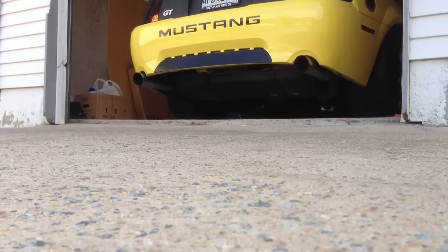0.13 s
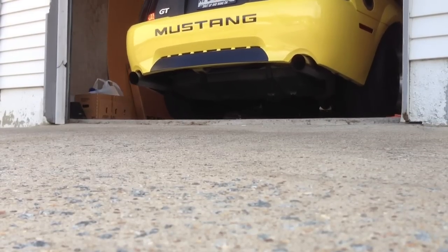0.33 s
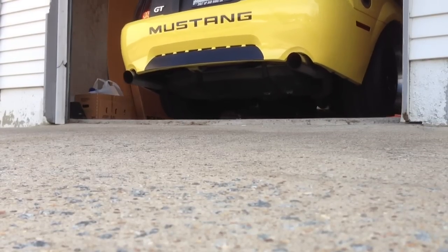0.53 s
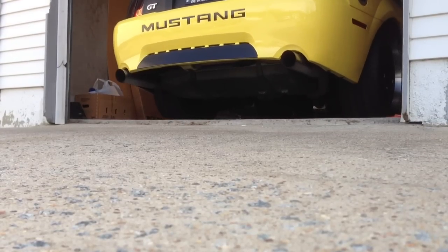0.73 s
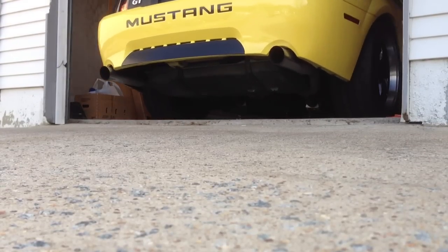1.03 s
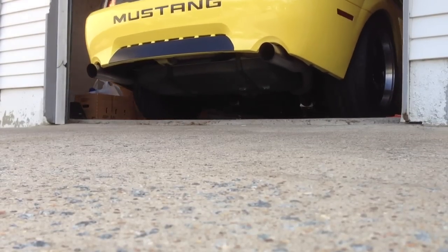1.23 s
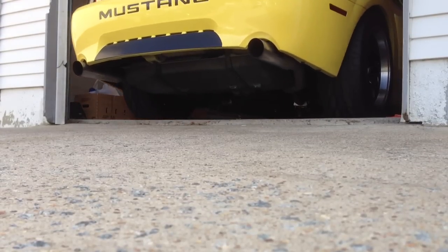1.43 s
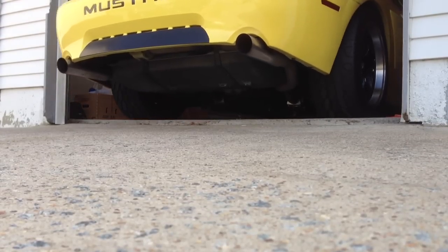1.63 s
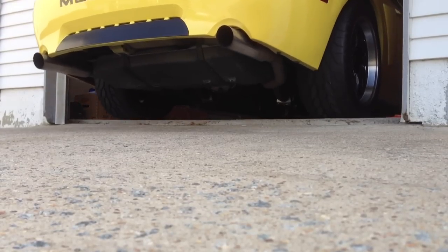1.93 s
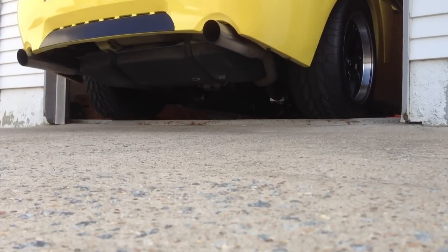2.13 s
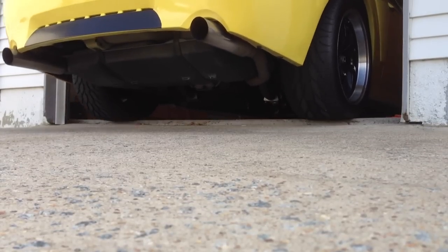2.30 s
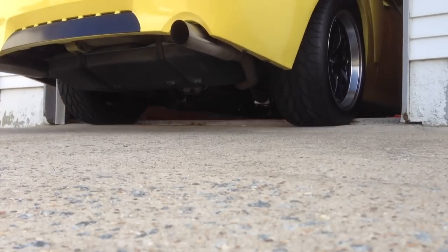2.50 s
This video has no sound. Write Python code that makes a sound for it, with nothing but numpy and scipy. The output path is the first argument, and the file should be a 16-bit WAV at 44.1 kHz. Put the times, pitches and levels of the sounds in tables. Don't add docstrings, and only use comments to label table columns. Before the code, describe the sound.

V8 car exhaust idles with a lumpy burble in a garage, then backs out growling louder

```python
import sys
import numpy as np
from scipy import signal
from scipy.io import wavfile
from scipy.ndimage import uniform_filter1d

SR = 44100
rng = np.random.default_rng(int(sys.argv[2]) if len(sys.argv) > 2 else 0)


def to_wav(sig):
    pcm = np.clip(np.atleast_2d(sig), -1, 1) * 32767
    pcm = np.round(pcm).astype(np.int16)
    wavfile.write(sys.argv[1], SR, pcm.T)


def voltage_ratio(decibels):
    exponent = np.asarray(decibels, float) / 20
    return 10 ** exponent


N = 117306

# t/s, four-stroke cycle rate/Hz
ENGINE_SPEED = [(0, 7.4), (.2, 7.05), (.4, 6.84), (.62, 6.77), (.8, 6.83), (.95, 7.1), (1.1, 7.62),
                (1.22, 7.8), (1.32, 8.15), (1.4, 8.5), (1.5, 8.92), (1.65, 9.33), (1.77, 9.47), (1.9, 9.51),
                (2.1, 9.42), (2.38, 9.27), (2.66, 9.38)]
# t/s, exhaust level/dB, engine-bay level/dB, share out of the garage/0-1
APPROACH = [(0, -30, -45.5, 0.37), (.2, -28.5, -46.5, 0), (.45, -29.5, -46.5, 0.28), (.7, -27, -46, 0.43),
            (.9, -29, -44.5, 0.11), (1.05, -25.5, -43.5, 0.35), (1.2, -21, -42, 0.65),
            (1.35, -22, -41.5, 0.49), (1.5, -16.5, -40, 0.9), (1.7, -15.5, -39.5, 0.75),
            (1.95, -17, -39.5, 0.75), (2.2, -16.5, -40, 0.85), (2.45, -17, -40.5, 0.83),
            (2.66, -15, -40, 0.87)]
FIRING_PIPE = [0, 1, 0, 1, 1, 0, 1, 0]
# level/dB, delay/ms, brightness/per octave
CYLINDERS = [(1.5, 0.083, -0.53), (-.5, 0.088, .5), (1.5, 0.13, 0.056), (0, 1.51, 0.65),
             (-6, 0.074, -0.064), (-2.5, 0.17, -.1), (-3, 0.13, 0.074), (-6.5, 0.081, 0.21)]
# f/Hz, width/Hz, near-pipe level/dB, far-pipe level/dB, change inside the garage/dB
PIPE_MODES = [(104.8, 5.5, -10, -19, -12), (123.7, 23.8, -11.5, -12, 17), (170, 19, -20.5, -24, 7),
              (196.1, 13.7, 1, -7.5, -0.5), (223.6, 7.1, -4.5, -9, -7), (261, 20.8, 0, -5.5, 1),
              (309.3, 11.5, -13.5, -2.5, 1), (344, 27.3, -6.5, -3, -4), (369, 14, -10, -8.5, -6.5),
              (453.5, 18, -11, -10.5, 3.5), (576, 14, -20.5, -21.5, 6.5), (660.7, 62, -19, -21.5, -6.5),
              (266, 110, -12, -20, -21), (483, 56, -22.5, -17, -10)]
# f/Hz, density/dB per Hz
RUMBLE_SPECTRUM = [(12, -67), (20, -37), (48, -54), (107, -12.5), (260, -3.5), (401, -9), (455, -8.5),
                   (857, -22), (1500, -34.5), (1950, -41), (3300, -120)]
DRONE_ORDERS = [39, 24, 18, 21, 40]
# f/Hz, width/Hz, level against the exhaust/dB
STANDING_WAVES = [(263.7, 19, -2), (191, 14, 2.5), (126.4, 14, -8.5), (197, 11.7, -8.5), (331, 20, -2)]
# f/Hz, density/dB per Hz
BAY_SPECTRUM = [(410, -17), (700, -5), (990, -10.5), (1150, -9), (2030, -16), (2400, -14.5), (4170, -16.5),
                (7060, -23.5), (15100, -42.5)]
# t/s, peak level/dB, f/Hz
GRIT_CRACKS = [(.7907, -37.5, 7500), (.9924, -43, 8000), (1.148, -31.5, 7000), (1.1785, -40, 10000),
               (1.2062, -44, 11000), (1.2544, -45, 9000), (1.3353, -23, 6300), (1.3424, -19, 7380),
               (1.4659, -28, 8200), (1.5364, -37, 9000), (1.5664, -34.5, 10500), (1.61, -36.5, 10000),
               (1.6272, -35, 10400), (1.634, -40, 10000), (1.9826, -41, 10000), (2.1264, -55.5, 9200),
               (2.6107, -32, 11500)]
# f/Hz, density/dB per Hz
STREET_SPECTRUM = [(12, -32), (25, -8), (50, -4), (90, 2), (130, -18), (200, -60)]

FIRST_CYL_S = 2.073
IDLE_HZ, PULL_HZ, UNEVEN_IDLE = 6.8, 9.3, .45
SCATTER_DB, SCATTER_MS = .8, .1
STUMBLE_DB, STUMBLE_MS = .35, .3
FAR_PIPE_MS, SKIRT_HZ, SWEEP_MS_PER_KHZ = 2.55, 52.6, 18.15
TONE_HZ = 270
GARAGE_T60_S, GARAGE_DB = 0.28, 5.5
DEAD_HZ, DEAD_WIDTH_HZ, DEAD_SHARE = 149, 22, .7
RUMBLE_DB, BOOM_DB = -12, 4
DRONE_LUMP, DRONE_LUMP_TURN = .3, .85
PUFF, PUFF_SHARE, LOPE_SHARE, PATCH_DB = 0.42, 0.14, 0.026, 1.5
CRACK_S, CRACK_TAIL_S, CRACK_TAIL_DB = 0.00059, 0.0078, -19.5
CRACK_WIDTH, SNAP_DB = .58, -1
FINE_GRIT_PER_S, FINE_GRIT_DB = 30, -48
STREET_DB = -59
EDGE_HZ = 15350


def evened(x):
    return x / np.sqrt(np.mean(x ** 2) + 1e-20)


def along(table, column):
    rows = np.array(table)
    return np.interp(np.arange(N) / SR, rows[:, 0], rows[:, column])


def resonate(x, hz, width):
    pole = np.exp((2j * np.pi * hz - np.pi * width) / SR)
    return 2 * signal.lfilter([1 - abs(pole)], [1, -pole], x).real


def noise(spectrum, patch_db):
    hz = np.fft.rfftfreq(1024, 1 / SR)
    real, imag, patch = rng.standard_normal((N // 256 + 5, 513, 3)).T
    patch = uniform_filter1d(patch, size=14, axis=0)
    patch = evened(uniform_filter1d(patch, size=8, axis=1))
    f, db = np.transpose(spectrum)
    shape = np.interp(np.log(hz + 1), np.log(f + 1), db)[:, None]
    bins = (real + 1j * imag) * voltage_ratio(shape + patch_db * patch)
    return evened(signal.istft(bins, nperseg=1024, noverlap=768)[1][:N])


def firing_count():
    firings = 8 * np.cumsum(along(ENGINE_SPEED, column=1)) / SR
    return firings - firings[round(FIRST_CYL_S * SR)] + 800


def exhaust():
    inside = 1 - np.clip(along(APPROACH, column=3), 0, 1)
    kicks = firing_kicks()
    warm = round(2 * SR / ENGINE_SPEED[0][1])
    kicks = np.c_[kicks[:, :warm], kicks]
    inside_warm = np.r_[inside[:warm], inside]
    kicks = kicks + voltage_ratio(GARAGE_DB) * inside_warm * garage_echoes(kicks)
    out = ringing_pipes(kicks, inside_warm)[warm:]
    out = out - DEAD_SHARE * resonate(out, DEAD_HZ, DEAD_WIDTH_HZ)
    power = uniform_filter1d(uniform_filter1d(out ** 2, size=9000), size=9000)
    out = out / np.sqrt(power)
    rumble = voltage_ratio(RUMBLE_DB + BOOM_DB * inside) * noise(RUMBLE_SPECTRUM, patch_db=2.6)
    return voltage_ratio(along(APPROACH, column=1)) * (out + drones() + rumble)


def firing_kicks():
    count, speed = firing_count(), along(ENGINE_SPEED, column=1)
    k = np.arange(np.ceil(count[0]), count[-1]).astype(int)
    db, late_ms, tone = np.array(CYLINDERS)[k % len(CYLINDERS)].T
    pipe = np.array(FIRING_PIPE)[k % len(CYLINDERS)]
    luck = rng.standard_normal((400, 2))[:len(k)]
    at = np.interp(k, count, np.arange(N))
    now = at.astype(int)
    climb = np.maximum(np.gradient(speed) * SR, 0)[now]
    pull = np.interp(speed[now], [IDLE_HZ, PULL_HZ], [UNEVEN_IDLE, 1])
    scatter_ms = (SCATTER_MS + STUMBLE_MS * climb) * luck[:, 0]
    scatter_db = (SCATTER_DB + STUMBLE_DB * climb) * luck[:, 1]
    at = at + (late_ms + FAR_PIPE_MS * pipe + scatter_ms) * SR / 1000
    at = np.clip(at.astype(int), 0, N - 1)
    kicks = np.zeros((4, N))
    kicks[pipe, at] = voltage_ratio(2 * db * pull + scatter_db)
    kicks[pipe + 2, at] = tone * kicks[pipe, at]
    return kicks


def garage_echoes(kicks):
    t = np.arange(SR // 2) / SR
    sign = rng.choice([-1., 1.], (2, len(t)))
    struck = rng.random((2, len(t))) < 400 / SR
    walls = sign * struck * voltage_ratio(-60 * t / GARAGE_T60_S)
    walls = np.r_[walls, walls] / np.linalg.norm(walls[0])
    return signal.fftconvolve(kicks, walls, axes=1)[:, :kicks.shape[1]]


def ringing_pipes(kicks, inside):
    out = 0
    for i, (hz, width, near_db, far_db, inside_db) in enumerate(PIPE_MODES):
        near, far = kicks[:2] + np.log2(hz / TONE_HZ) * kicks[2:]
        drive = voltage_ratio(near_db) * near + (-1) ** i * voltage_ratio(far_db) * far
        ring = resonate(resonate(drive, hz, width), hz, width + SKIRT_HZ)
        late = round(SWEEP_MS_PER_KHZ * hz * SR / 1000 ** 2)
        out = out + voltage_ratio(inside_db * inside) * np.roll(ring, late)
    out = signal.sosfilt(signal.butter(6, 92, "high", fs=SR, output="sos"), out)
    return signal.sosfilt(signal.butter(2, 800, fs=SR, output="sos"), out)


def drones():
    cycles = firing_count() / len(CYLINDERS)
    lump = 1 + DRONE_LUMP * np.cos(2 * np.pi * (cycles - DRONE_LUMP_TURN))
    out = np.zeros(N)
    for order, (hz, width, db) in zip(DRONE_ORDERS, STANDING_WAVES):
        tone = np.cos(2 * np.pi * order * cycles)
        out += voltage_ratio(db) * resonate(resonate(tone, hz, width), hz, width)
    return lump * out


def engine_bay():
    count = firing_count()
    puff = PUFF_SHARE * np.exp(-(count % 1) / PUFF) / PUFF
    lope = LOPE_SHARE * np.cos(2 * np.pi * (count - 2.5) / len(CYLINDERS))
    level = voltage_ratio(along(APPROACH, column=2) + 2.28)
    return level * noise(BAY_SPECTRUM, PATCH_DB) * evened(1 + puff + lope)


def grit():
    out, t = np.zeros(N + 2000), np.arange(2000) / SR
    decay = np.exp(-t / CRACK_S) + voltage_ratio(CRACK_TAIL_DB) * np.exp(-t / CRACK_TAIL_S)
    shape = np.minimum(t / 0.0004, 1) * decay
    for s, db, hz in GRIT_CRACKS:
        fizz = rng.standard_normal(len(t))
        width = CRACK_WIDTH * hz
        ring = resonate(resonate(fizz, hz, width), hz, width)
        snap = np.cos(2 * np.pi * hz * t) * np.exp(-((t - .0009) * hz / 0.48) ** 2)
        out[round(s * SR):][:len(t)] += voltage_ratio(db) * (shape * evened(ring) + voltage_ratio(SNAP_DB) * snap)
    struck = rng.random(N) < FINE_GRIT_PER_S / SR
    fine = struck * voltage_ratio(2.0 * np.minimum(rng.exponential(1, N), 4))
    tick = shape * evened(resonate(rng.standard_normal(len(t)), 9000, 6000))
    rolling = voltage_ratio(along(APPROACH, column=2) - APPROACH[-1][2])
    return out[:N] + voltage_ratio(FINE_GRIT_DB) * rolling * signal.oaconvolve(fine, tick)[:N]


def street():
    return voltage_ratio(STREET_DB) * noise(STREET_SPECTRUM, patch_db=0.0)


def scene():
    return (exhaust() + engine_bay() + grit() + street())[None]


def top_cut(x):
    return signal.sosfilt(signal.butter(12, 15210, fs=SR, output="sos"), x)


def record(dry):
    edge = signal.firwin(511, EDGE_HZ, window=("kaiser", 9), fs=SR)
    limited = signal.oaconvolve(dry, edge[None], "same")
    return top_cut(limited)


dry = scene()
out = record(dry)
to_wav(out)
```